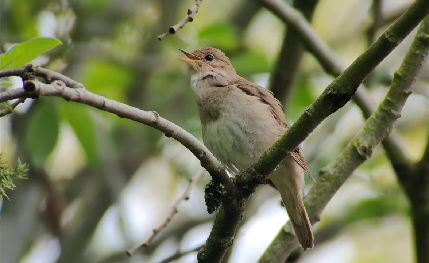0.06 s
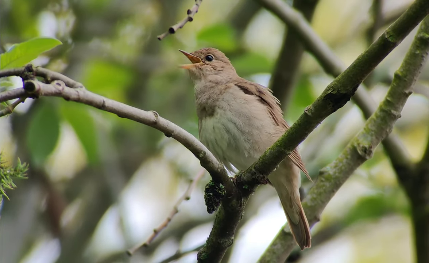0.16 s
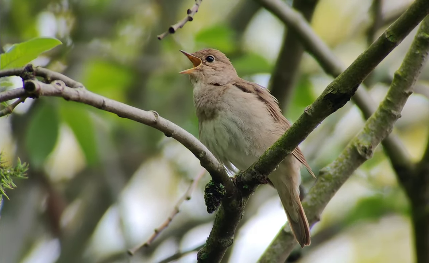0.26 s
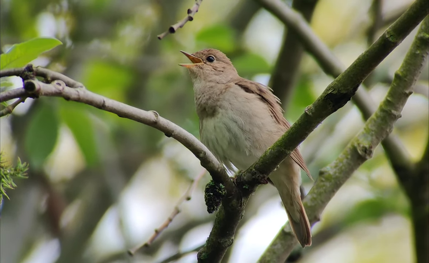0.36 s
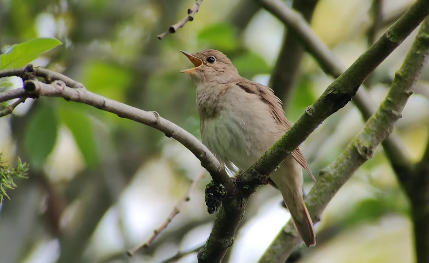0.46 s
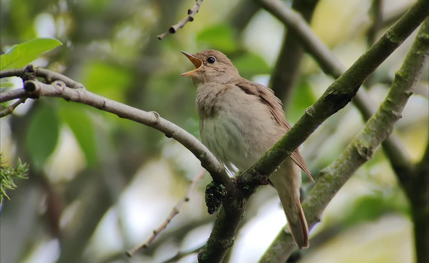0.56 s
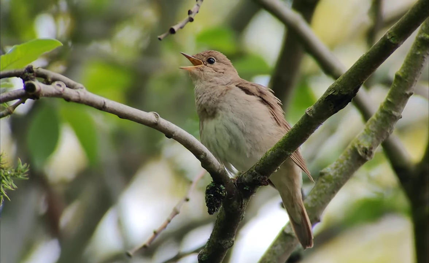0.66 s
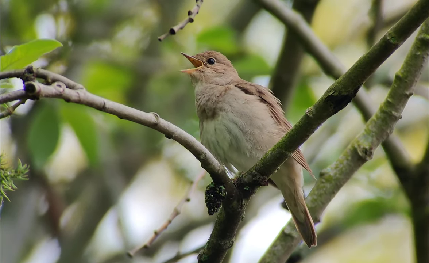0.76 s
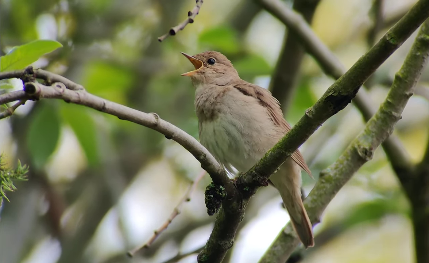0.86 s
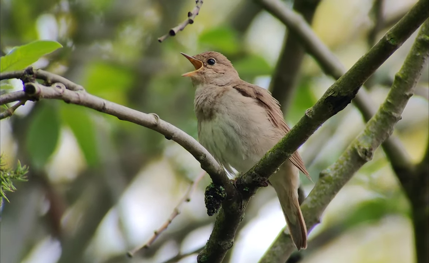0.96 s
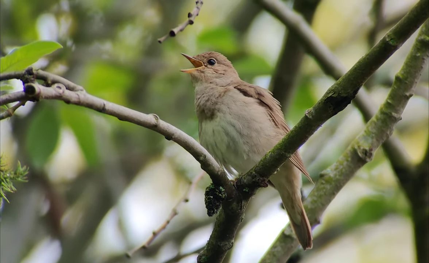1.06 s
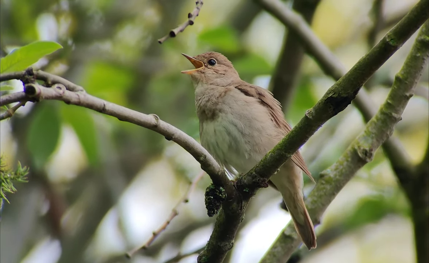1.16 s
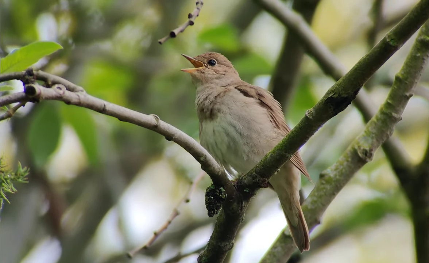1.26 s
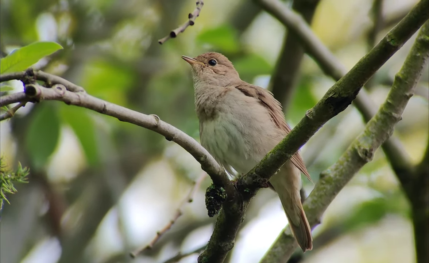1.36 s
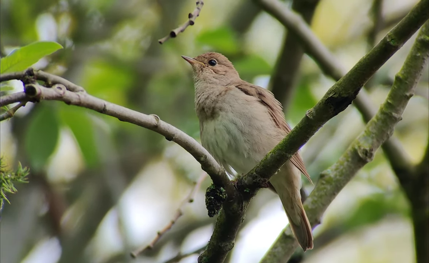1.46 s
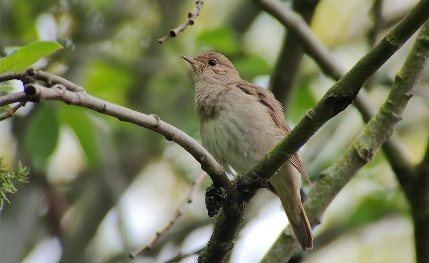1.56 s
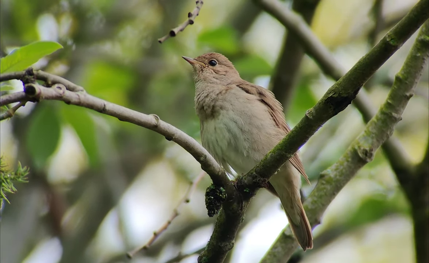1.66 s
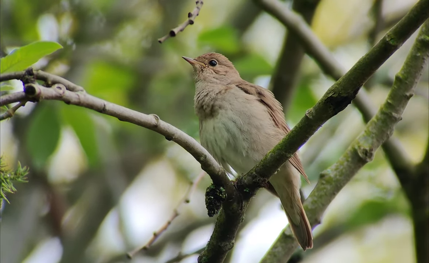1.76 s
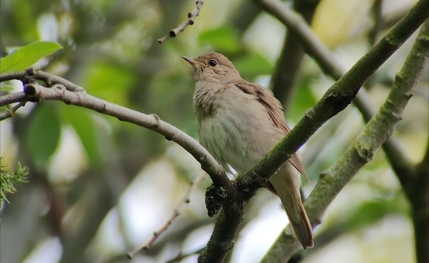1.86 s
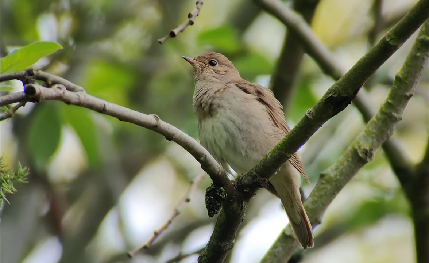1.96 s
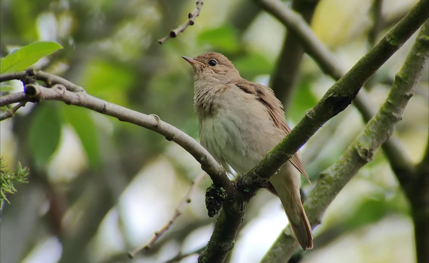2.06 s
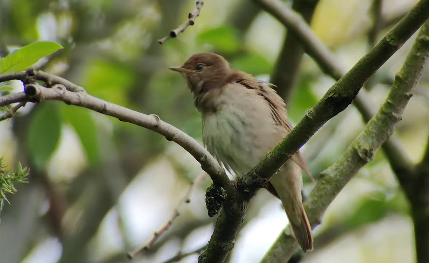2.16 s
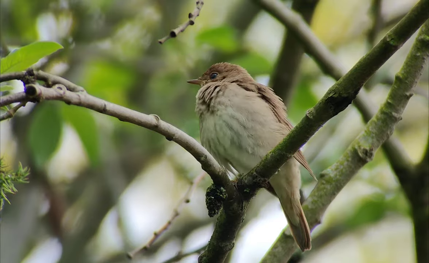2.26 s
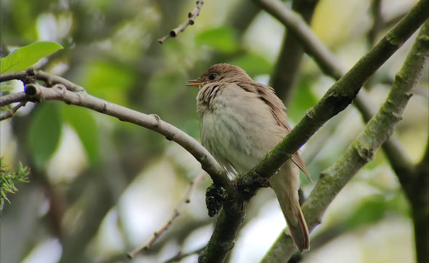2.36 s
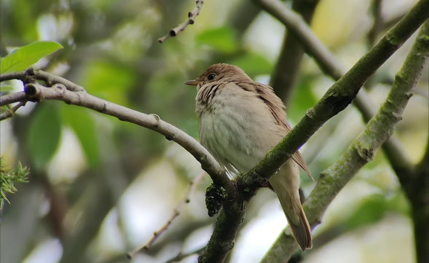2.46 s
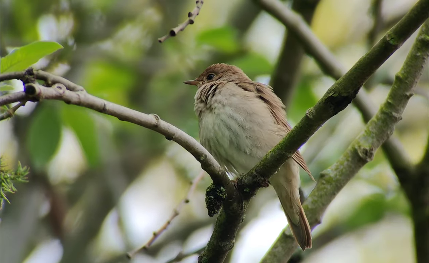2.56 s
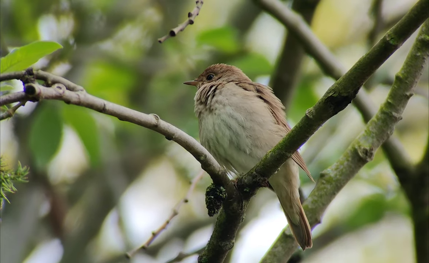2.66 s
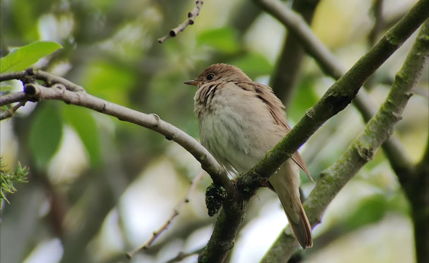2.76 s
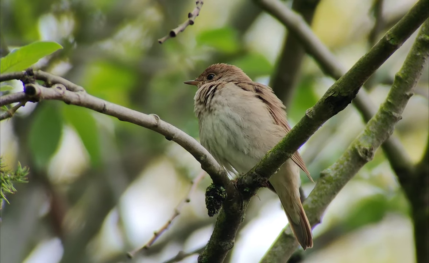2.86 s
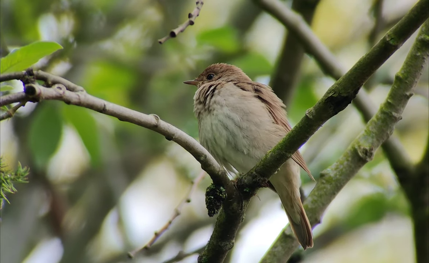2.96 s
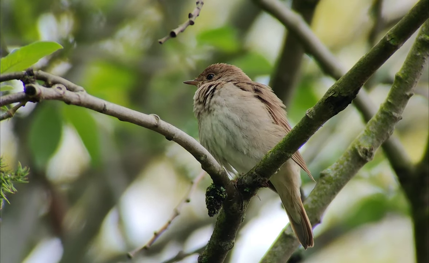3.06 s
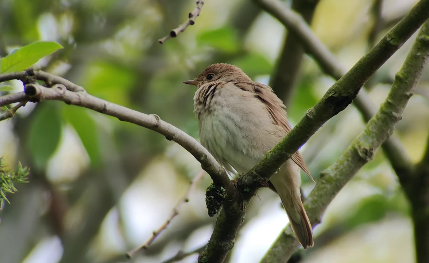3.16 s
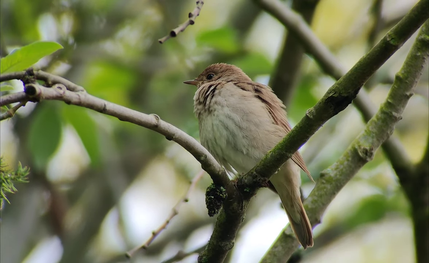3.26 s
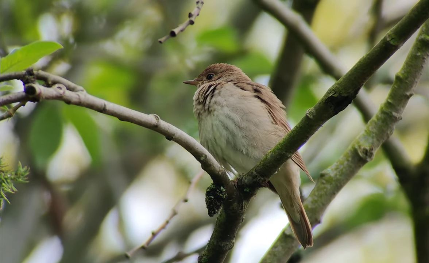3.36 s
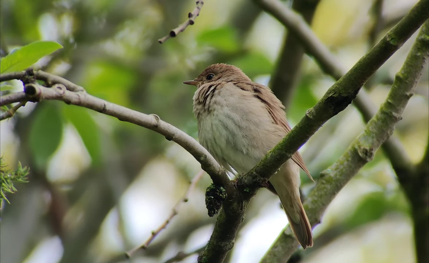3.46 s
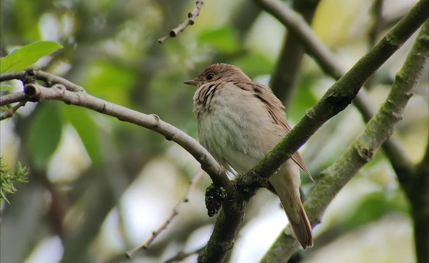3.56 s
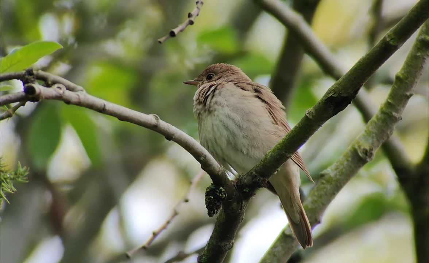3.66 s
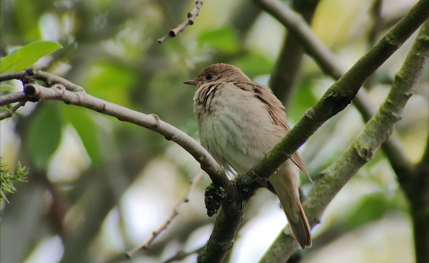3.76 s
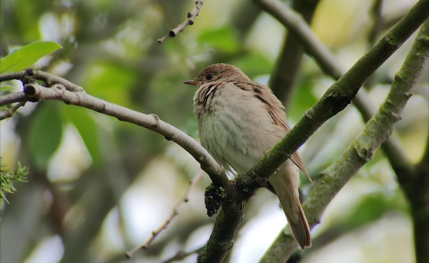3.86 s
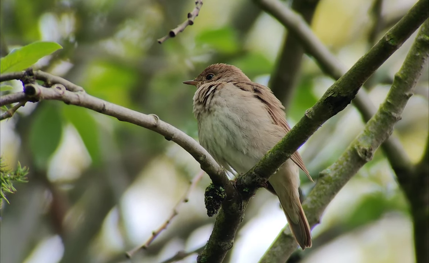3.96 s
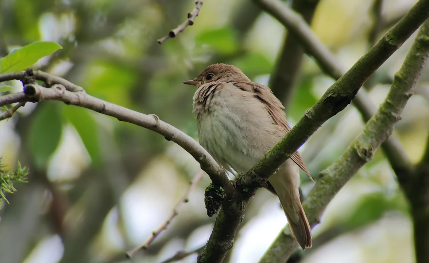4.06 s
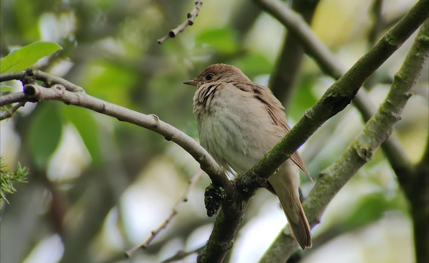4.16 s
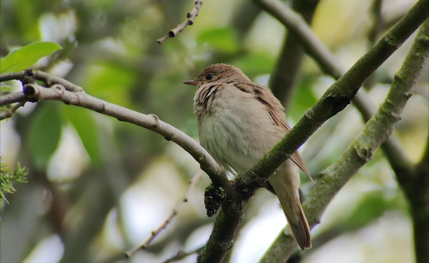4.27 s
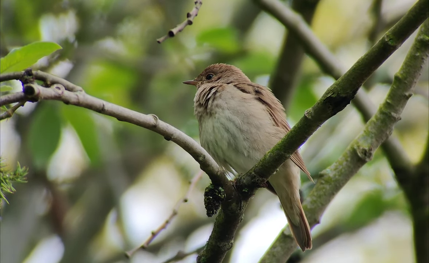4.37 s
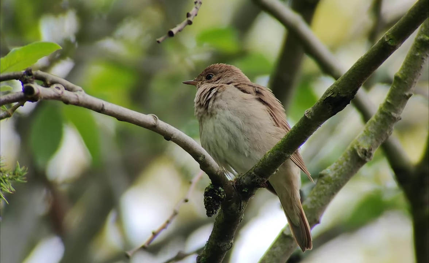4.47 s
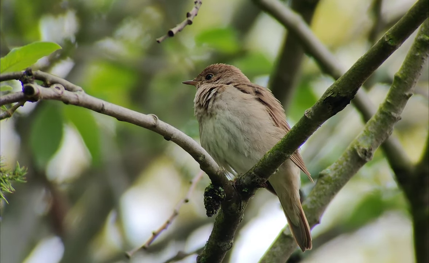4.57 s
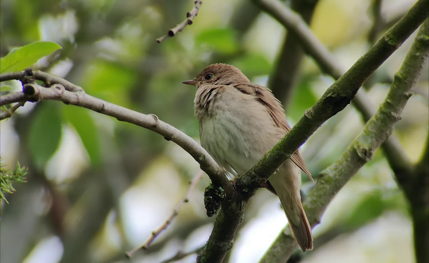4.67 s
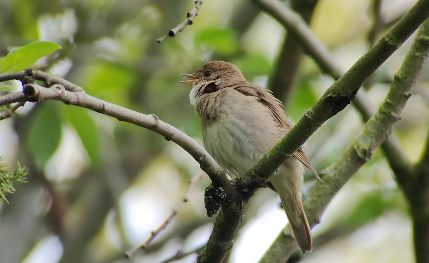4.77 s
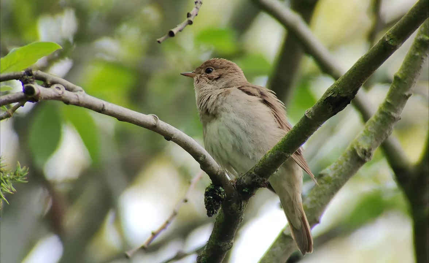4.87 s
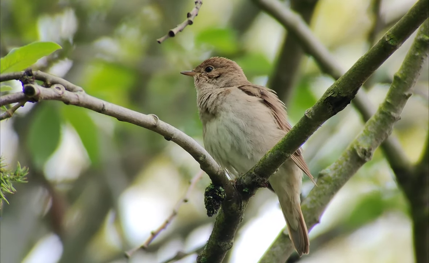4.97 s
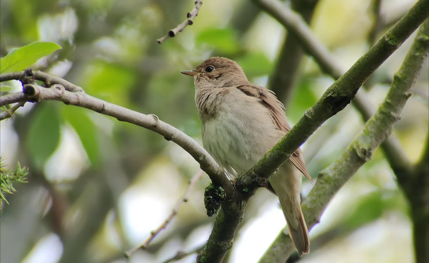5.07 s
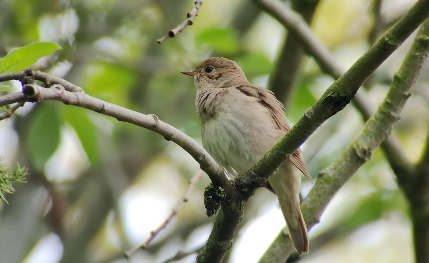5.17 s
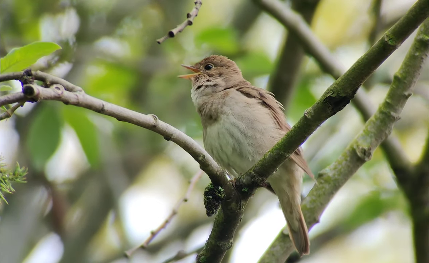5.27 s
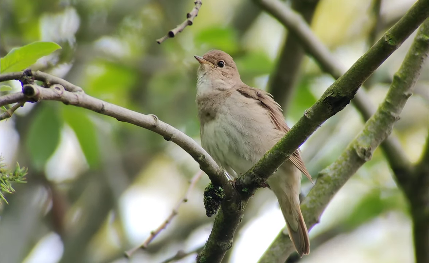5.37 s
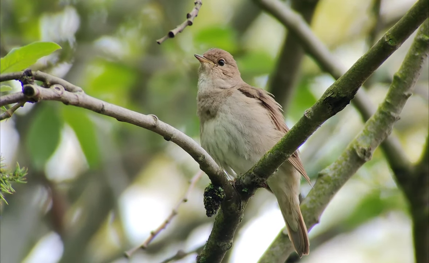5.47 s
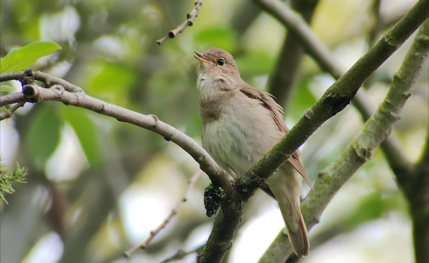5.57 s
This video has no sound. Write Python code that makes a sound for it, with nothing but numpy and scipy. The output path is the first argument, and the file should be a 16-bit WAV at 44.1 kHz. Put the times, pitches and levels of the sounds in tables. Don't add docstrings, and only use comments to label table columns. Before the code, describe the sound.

A nightingale on a near branch opens with quick whistled chirps, climbing and dropping, then rattles dry double clicks for almost a second. It goes quiet while throbbing frog croaks come from the right and small far birds peep. Near the end it gives a few soft low notes. Trees return a short lumpy echo; distant traffic drones low beneath faint leaf hiss, heard in wide stereo by spaced microphones.

```python
import sys
import numpy as np
from scipy import signal
from scipy.io import wavfile
from scipy.ndimage import uniform_filter1d

SR = 44100
rng = np.random.default_rng(int(sys.argv[2]) if len(sys.argv) > 2 else 0)


def waveform_to_disk(signal):
    frames = np.transpose(np.atleast_2d(signal))
    scaled = np.clip(frames, -1, 1) * 32767
    samples = np.round(scaled).astype(np.int16)
    wavfile.write(sys.argv[1], SR, samples)


def ratio(d):
    e = np.asarray(d, float) / 20
    return 10 ** e


N = 247842

# time in seconds, pitch in Hz, peak level in dB.
HOOK = [
    (.179, 2035, -34.5),
    (.184, 1455, -35.5),
    (.192, 1398, -38),
    (.203, 1973, -26),
    (.209, 2290, -38.5),
]
# time in seconds, pitch in Hz, peak level in dB.
HIGH_NOTE = [
    (1.408, 9800, -60),
    (1.412, 9100, -46),
    (1.425, 8640, -35),
    (1.435, 7600, -42),
    (1.438, 7370, -43),
]
# steepest moment in seconds, spread in seconds, end in seconds, top in Hz, peak in dB.
RISES = [
    (.315, .013, .334, 6500, -40),
    (.321, .009, .334, 5800, -41),
    (.323, .0113, .348, 4900, -35),
    (.366, .018, .373, 6000, -26),
    (.391, .0087, .42, 4800, -23),
]
RISE_LOW_HZ, RISE_LEAD_S, PHRASE_S = 2500, 0.042, 0.315
SWELL_DB_PER_S, RISE_RELEASE_S, RISE_RELEASE_DB = 953, 0.0091, 11.5
# start in seconds, length in seconds, from Hz, to Hz, peak level in dB.
FLICKS = [
    (0.212, 0.018, 3050, 1560, -19),
    (4.936, 0.0067, 2030, 1500, -35),
    (5.412, 0.0095, 2530, 2200, -29),
    (5.453, .011, 2040, 1580, -28),
]
FLICK_ATTACK, FLICK_BEND = 0.11, 0.57
FLICK_ATTACK_DB, FLICK_FADE_DB = 15.5, 19
# start in seconds, length in seconds, pitch in Hz, peak level in dB.
HELD = [
    (4.904, 0.026, 2187, -33),
    (5.417, 0.034, 2204, -27.5),
]
HELD_ATTACK, HELD_RELEASE, HELD_EDGE_DB = 0.35, 0.37, 10
HOARSE_DB, HOARSE_T60_S = -50, 0.71
# time in seconds, peak level in dB.
RATTLE = [(.5277, -38), (0.5879, -38), (.645, -34.5), (.7006, -34.5), (.7591, -37), (.8182, -36),
          (0.8768, -35), (0.9338, -34), (0.9903, -34.5), (1.0483, -37.5), (1.1052, -35), (1.1637, -38),
          (1.2204, -33.5), (1.279, -34), (1.3376, -35.5)]
# time in seconds, peak level in dB.
LONE_CLICKS = [
    (.3159, -30.5),
    (.4683, -37),
]
PAIR_GAP_S, SECOND_DB = 0.0067, 3.5
# pitch in Hz, level in dB, time to fall 60 dB in seconds.
BEAK = [(3130, -5.5, 0.0051), (3530, -3, 0.0068), (4140, -1.5, 0.0061), (5050, -1.5, 0.007),
        (5870, -3.5, 0.0043), (6900, -13, 0.019), (8500, -29, 0.0018), (11100, -13.5, 0.0019),
        (13100, -11, .0020)]

# start in seconds, length in seconds, top pitch in Hz, throbs per second, level in dB.
SLOW_FROG = [
    (2.3544, 0.13, 849, 61, -56.5),
    (3.1789, 0.21, 908, 87, -45.5),
    (3.8482, .24, 924, 52, -45),
    (4.0882, 0.059, 863, 61, -55.5),
    (4.2265, .11, 879, 51, -59.5),
    (4.5674, 0.285, 910.4, 59, -45.5),
    (4.8731, 0.13, 801, 43, -48),
    (5.0742, 0.18, 880, 49.5, -48.5),
    (5.4163, 0.22, 931, 74, -46),
]
# start in seconds, length in seconds, top pitch in Hz, throbs per second, level in dB.
QUICK_FROG = [
    (1.6071, 0.27, 957, 66.5, -59),
    (2.2629, 0.13, 984, 75.9, -57),
    (2.8812, 0.09, 1029, 75.4, -53),
    (3.387, 0.095, 1054, 63.3, -51.5),
    (4.3451, .2, 1014, 86.9, -45.5),
    (4.9967, 0.25, 998, 69.5, -46),
    (5.239, 0.35, 1032, 84.55, -44.5),
]
# start in seconds, length in seconds, top pitch in Hz, throbs per second, dB.
FRONT_FROG = [
    (2.5698, .2, 878, 62.1, -48),
    (2.5698, .19, 1063, 64.2, -59),
]
# frequency in Hz, level in dB.
SLOW_SAC = [(900, -11), (1750, 2), (2700, -11), (3900, -13.5), (4500, -4), (5400, -11), (6300, -24),
            (7300, -20), (8500, -69)]
QUICK_SAC = [(1000, -15.5), (2000, 1.5), (3000, -11.5), (4000, -7.5), (5000, -2.5), (6000, -15),
             (7000, -28), (8200, -74)]
FRONT_SAC = [(900, -12), (1750, 12), (2700, -9), (3900, -13), (4500, -1), (5400, -18), (8500, -50)]
SLOW_BANDS = [1, 2, 3.08, 4.4, 5.15, 6, 7, 8]
QUICK_BANDS = [1, 2, 3, 4, 4.95, 6, 7, 7]
# slope in dB per octave at -50 dB, extra slope per dB of effort.
SLOW_BRIGHT = (-0.94, 0.039)
QUICK_BRIGHT = (-3.2, 0.53)
FRONT_BRIGHT = (-2.1, 1.9)
SLOW_ARCH, QUICK_ARCH = 1.0, 1.5
WAVER_POWER, ARCH_POWER = 0.4, 0.6

# start in seconds, length in seconds, from Hz, to Hz, peak level in dB.
FAR = [(.02, .045, 2700, 2670, -46), (.1, .055, 2000, 1900, -47), (1.665, .05, 6100, 6230, -60),
       (2.51, .025, 4190, 4550, -58), (2.855, .022, 4090, 4670, -50), (3.53, .04, 2900, 2700, -58),
       (3.605, .055, 2710, 2690, -51), (3.705, .045, 3200, 2950, -58), (3.77, .07, 2620, 2540, -61),
       (1.96, .36, 8230, 8160, -71), (5.04, .04, 4370, 4350, -48), (5.305, .05, 4350, 4330, -46),
       (5.535, .045, 4350, 4320, -45)]

# time in seconds, drone level in dB.
TRAFFIC = [
    (0.0, -41),
    (0.42, -41),
    (2.14, -46),
    (2.69, -44),
    (3.35, -43),
    (4.76, -42),
    (4.91, -42.5),
    (5.07, -41.5),
    (5.31, -40.5),
    (5.62, -41.5),
]
# frequency in Hz, level in dB per Hz.
DRONE = [(22, -8), (32, -8.5), (44, -6), (62, -9), (75, -6.5), (95, -12), (115, -16), (145, -33.5),
         (170, -57)]
# pitch in Hz, width in Hz, dB relative to the drone, share from the right 0-1.
ENGINES = [(140.7, 14.6, -23.5, 0.99), (313.7, 3.5, -28, 0.2), (412, 32, -21, 1), (1317, 28, -20, 0.54)]
# multiple of the firing rate, dB relative to the drone.
FIRING_ORDERS = [(1, -2.5), (2, -9.5)]
FIRING_HZ = 45.3
# frequency in Hz, level in dB per Hz.
AIR = [(71, -31), (120, -3.5), (247, -12.5), (271, -5), (313, -6), (449, -6.5), (610, -9), (1210, -11),
       (1740, -9), (2410, -16.5), (2880, -18), (3100, -15), (9000, -44.5), (11700, -70), (19800, -120)]
# frequency in Hz, share from the right 0-1.
LIKENESS = [(30, 1), (130, 0.9), (300, 1), (700, 0.45), (1500, 0.32), (3000, 0.48), (9000, .02)]
AIR_DB, AIR_FOLLOWS = -55.5, 0.84
LEAVES_DB, LEAVES_FOLLOWS = -70.5, 3.6
HISS_DB, HISS_FOLLOWS = -69.5, 0.46
RUSTLE_DB, RUSTLE_T60_S = -64, 9
LIFT_END_S, LIFT_DB, LIFT_EDGE_S = 1.34, -61.5, 0.06


def whistles(notes, edge_s, overtone_db):
    out = np.zeros(N)
    for rows in notes:
        s, hz, db = np.transpose(rows)
        at = np.arange(max(round((s[0] - edge_s) * SR), 0), round((s[-1] + edge_s) * SR))
        t = at / SR

        def smooth(points):
            return uniform_filter1d(np.interp(t, s, points), size=90)

        pitch = smooth(hz)
        fade = np.clip(np.minimum(t - t[0], t[-1] - t) / edge_s, 0, 1)
        turn = 2 * np.pi * np.cumsum(pitch) / SR
        octave = ratio(overtone_db - 9 * pitch / 1000) * np.sin(2 * turn)
        out[at] += fade * ratio(smooth(db)) * (np.sin(turn) + octave)
    return out


def rise(steepest, spread, end, top_hz, db):
    s = np.linspace(max(PHRASE_S, steepest - RISE_LEAD_S), end, 40)
    hz = RISE_LOW_HZ + (top_hz - RISE_LOW_HZ) / (1 + np.exp((steepest - s) / spread))
    swell_db = -SWELL_DB_PER_S * np.maximum(steepest - s, 0)
    release = np.clip(1 - (end - s) / RISE_RELEASE_S, 0, 1)
    return np.transpose([s, hz, db + swell_db - RISE_RELEASE_DB * release])


def flick(start, length, from_hz, to_hz, db):
    part = np.linspace(0, 1, 20)
    level_db = db - np.interp(part, [0, FLICK_ATTACK, 1], [FLICK_ATTACK_DB, 0, FLICK_FADE_DB])
    hz = from_hz + (to_hz - from_hz) * part ** FLICK_BEND
    return np.transpose([start + length * part, hz, level_db])


def held(start, length, from_hz, to_hz, db):
    part = np.array([0, HELD_ATTACK, 1 - HELD_RELEASE, 1])
    hz = from_hz + (to_hz - from_hz) * part
    return np.transpose([start + length * part, hz, db - HELD_EDGE_DB * np.array([1, 0, 0, 1])])


def song_notes():
    rises = [rise(*row) for row in RISES]
    flicks = [flick(*row) for row in FLICKS]
    soft = [held(s, length, hz, hz, db) for s, length, hz, db in HELD]
    return [HOOK, HIGH_NOTE] + rises + flicks + soft


def hoarse():
    since = np.arange(N) / SR - PHRASE_S
    band = signal.butter(2, [4800, 7200], "band", fs=SR, output="sos")
    air = signal.sosfilt(band, rng.standard_normal(N))
    return rms_one(air) * (since > 0) * ratio(HOARSE_DB - 60 * np.maximum(since, 0) / HOARSE_T60_S)


def rattle():
    second_clicks = [(s + PAIR_GAP_S, db + SECOND_DB) for s, db in RATTLE]
    hits = list(LONE_CLICKS) + list(RATTLE) + second_clicks
    at = [round(s * SR) + 20 for s, db in hits]
    shape = np.minimum(np.arange(130) / 18, 1) * ratio(-np.arange(130) / 9)
    crackle = shape * rng.standard_normal((len(at), len(BEAK), 130))
    out = np.zeros(N)
    for k, (hz, mode_db, t60) in enumerate(BEAK):
        push = np.full(N, 1e-18)
        for i, (s, db), burst in zip(at, hits, crackle[:, k]):
            push[i:i + 130] = burst * ratio(db + mode_db - 11.5)
        r, w = ratio(-60 / (t60 * SR)), 2 * np.pi * hz / SR
        out += signal.lfilter([0, np.sin(w)], [1, -2 * r * np.cos(w), r * r], push)
    return signal.sosfilt(signal.butter(4, 2600, "high", fs=SR, output="sos"), out)


def wood(x, gap_s, grain_db, t60):
    t = np.arange(SR) / SR
    lumps = ratio(grain_db * np.array([drift(144, SR), drift(73, SR)]))
    response = rng.standard_normal((2, SR)) * lumps * ratio(-60 * t / t60) * np.clip(t / gap_s, 0, 1)
    response /= np.sqrt(np.sum(response ** 2, axis=1, keepdims=True))
    return signal.fftconvolve(x[None], response, axes=1)[:, :N]


def effort(croaks, bright):
    return [(*row, bright[0] + bright[1] * (row[-1] + 50)) for row in croaks]


def frog(croaks, sac, bands, depth, duty, slide, jitter):
    out = np.zeros(N)
    for start, length, top_hz, rate, db, tilt_db in croaks:
        size = round(length * SR)
        part = np.arange(size) / size
        arch = np.interp(part, [0, 0.2, 0.5, 1], [0.85, 0.95, 0.97, 0.89])
        arch = uniform_filter1d(arch, size=size // 6) - 1
        throb = np.cumsum(rate * (1 + 0.03 * drift(15, size))) / SR % 1
        gate = np.sin(np.pi * np.clip(throb / duty, 0, 1)) ** 0.7
        waver = slide * (throb / duty - 0.5) + jitter * drift(384, size)
        stack = 0
        for k in bands:
            arch_shift = 2 * (k / 2) ** ARCH_POWER * depth * arch
            waver_shift = 2 * (k / 2) ** WAVER_POWER * waver
            hz = top_hz * (k + arch_shift + waver_shift)
            colour_db = at_hz(sac, hz) + tilt_db * np.log2(k / 2) + 2 * drift(220, size)
            stack = stack + ratio(colour_db) * np.sin(2 * np.pi * np.cumsum(hz) / SR + k * k)
        swell = np.clip(np.minimum(part / 0.26, (1 - part) / 0.14), 0, 1) ** 0.36
        at = round(start * SR)
        out[at:at + size] += (ratio(db) * swell * rms_one(gate * stack))[:N - at]
    return out


def engines():
    turn = 2 * np.pi * np.cumsum(FIRING_HZ * (1 + 0.04475 * drift(3.14))) / SR
    idle = sum(ratio(db + 2 * drift(3)) * np.sqrt(2) * np.sin(k * turn) for k, db in FIRING_ORDERS)
    out = placed(idle, 0.83, 1.4)
    for hz, width, db, share in ENGINES:
        r = np.exp(-np.pi * width / SR)
        poles = [1, -2 * r * np.cos(2 * np.pi * hz / SR), r * r]
        once = signal.lfilter([1, 0, -1], poles, rng.standard_normal((3, N + SR)))
        tone = signal.lfilter([1], poles, once)[:, SR:]
        out = out + ratio(db) * pair(*rms_one(tone), share, lag=18.6)
    return out


def coloured(spectrum, low_hz, high_hz, patchy_db, lag):
    out, white = 0, rng.standard_normal((2, 3, N))
    edges = np.geomspace(low_hz, high_hz, round(3 * np.log2(high_hz / low_hz)) + 1)
    for k, (low, high) in enumerate(zip(edges, edges[1:])):
        hz = np.sqrt(low * high)
        band = signal.sosfilt(signal.butter(2, [low, high], "band", fs=SR, output="sos"), white[k % 2])
        gain = ratio(at_hz(spectrum, hz) + patchy_db * drift(9.4))
        out = out + gain * pair(*band, at_hz(LIKENESS, hz), lag)
    return rms_one(out)


def leaves(swing_db):
    band = signal.butter(2, [3000, 7500], "band", fs=SR, output="sos")
    rustle = signal.sosfilt(band, rng.standard_normal((2, N)))
    return ratio(LEAVES_DB + LEAVES_FOLLOWS * swing_db) * rms_one(rustle)


def treble_gain(swing_db):
    t = np.arange(N) / SR
    lift_in, lift_out = (t - PHRASE_S) / 0.008, 1 - (t - LIFT_END_S) / LIFT_EDGE_S
    lift = ratio(LIFT_DB) * np.clip(np.minimum(lift_in, lift_out), 0, 1)
    steady = ratio(HISS_DB + HISS_FOLLOWS * swing_db)
    rustle = ratio(RUSTLE_DB - 60 * t / RUSTLE_T60_S)
    return np.sqrt(steady ** 2 + rustle ** 2 + lift ** 2)


def in_time(rows):
    s, *columns = np.transpose(rows)
    return [np.interp(np.arange(N) / SR, s, c) for c in columns]


def at_hz(points, hz):
    table_hz, values = np.transpose(points)
    return np.interp(np.log(hz), np.log(table_hz), values)


def rms_one(x):
    return x / np.sqrt(np.mean(x ** 2) + 1e-20)


def drift(rate, size=N):
    r = np.exp(-2 * np.pi * rate / SR)
    noise = rng.standard_normal(size + SR)
    return rms_one(signal.lfilter([1], [1, -2 * r, r * r], noise)[SR:])


def placed(x, lag, pan_db):
    late = np.interp(np.arange(N) - lag, np.arange(N), x)
    return np.array([late * ratio(pan_db / 2), x * ratio(-pan_db / 2)])


def pair(own_left, own_right, shared, share, lag):
    share = np.clip(share, 0, 1)
    return np.sqrt(share) * placed(shared, lag, 0) + np.sqrt(1 - share) * np.array([own_left, own_right])


def scene():
    song = ratio(1) * whistles(song_notes(), edge_s=0.001, overtone_db=-13) + hoarse()
    clicks = rattle()
    ring = signal.butter(1, [4700, 5800], "band", fs=SR, output="sos")
    sideways = signal.sosfilt(ring, clicks)
    into_wood = ratio(-2) * song + ratio(-8.5) * clicks + ratio(4.5) * sideways
    scatter = wood(into_wood, gap_s=0.002, grain_db=3.5, t60=0.39)
    near = placed(song + clicks, 0.97, 2.3) + scatter * ratio(np.array([[1.5], [-1.5]]))

    slow = frog(effort(SLOW_FROG, SLOW_BRIGHT), SLOW_SAC, SLOW_BANDS, SLOW_ARCH,
                duty=0.68, slide=0.13, jitter=0.04)
    quick = frog(effort(QUICK_FROG, QUICK_BRIGHT), QUICK_SAC, QUICK_BANDS, QUICK_ARCH,
                 duty=0.68, slide=0.22, jitter=0.04)
    front = frog(effort(FRONT_FROG, FRONT_BRIGHT), FRONT_SAC, SLOW_BANDS, SLOW_ARCH,
                 duty=0.64, slide=0.12, jitter=0.035)
    far = whistles([held(*row) for row in FAR], edge_s=0.0025, overtone_db=-16)
    pond = placed(slow, 20.85, 1.0) + placed(quick, 19.6, 0.43) + placed(front, -3.0, 0.1)
    pond = pond + placed(far, 17.2, 0.3)
    pond = pond + wood(ratio(-4) * (slow + quick + front) + ratio(-8) * far, gap_s=0.01, grain_db=2, t60=0.35)

    load_db, = in_time(TRAFFIC)
    swing_db = load_db - load_db.mean()
    drone_db = load_db + 1.5
    rumble = coloured(DRONE, 19.63, 171.3, 0.33, lag=1) * ratio(np.array([[0.6], [-0.6]]))
    drone = ratio(drone_db - 2) * rumble + ratio(drone_db) * engines()
    air = ratio(AIR_DB + AIR_FOLLOWS * swing_db + 5.5) * coloured(AIR, 118.4, 9980, 0.87, lag=19.4)
    treble = signal.butter(2, 5500, "high", fs=SR, output="sos")
    hiss = ratio(3.5) * treble_gain(swing_db) * signal.sosfilt(treble, rng.standard_normal((2, N)))
    return near + pond + drone + air + leaves(swing_db) + hiss


def roll_off(x):
    return signal.sosfilt(signal.butter(12, 16460, fs=SR, output="sos"), x)


def record(dry):
    cut = signal.sosfilt(signal.ellip(10, 0.3, 70, 15830, fs=SR, output="sos"), dry)
    return roll_off(cut)


dry = scene()
out = record(dry)
waveform_to_disk(out)
```